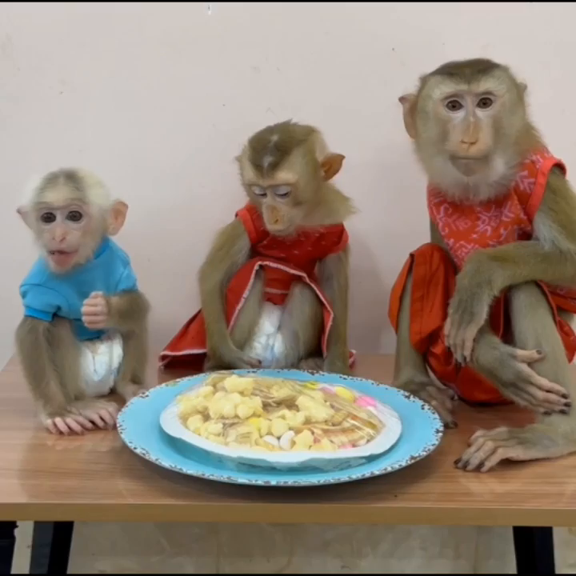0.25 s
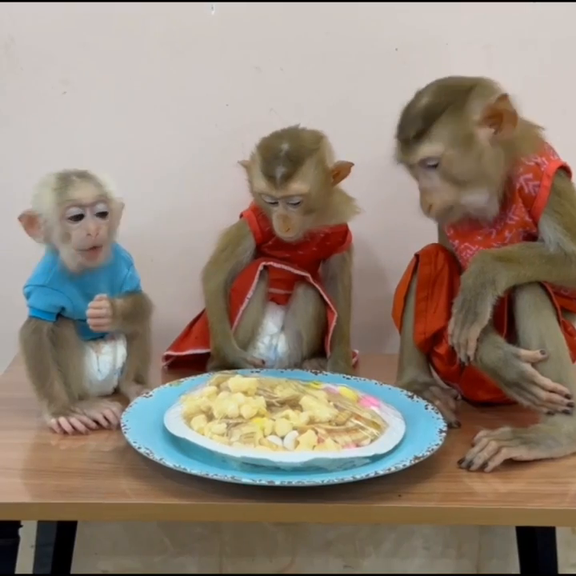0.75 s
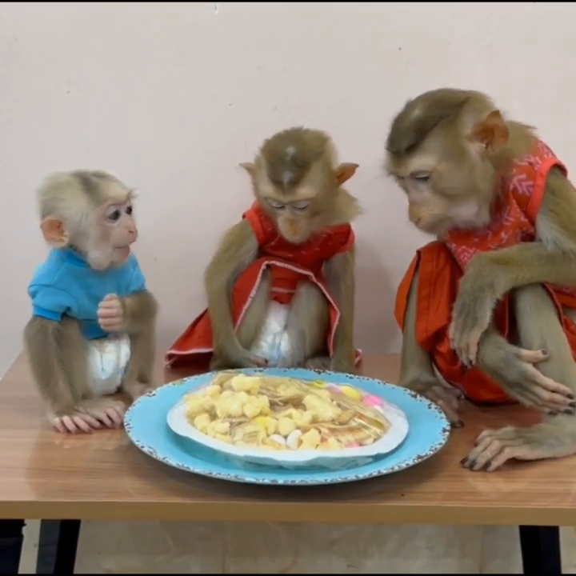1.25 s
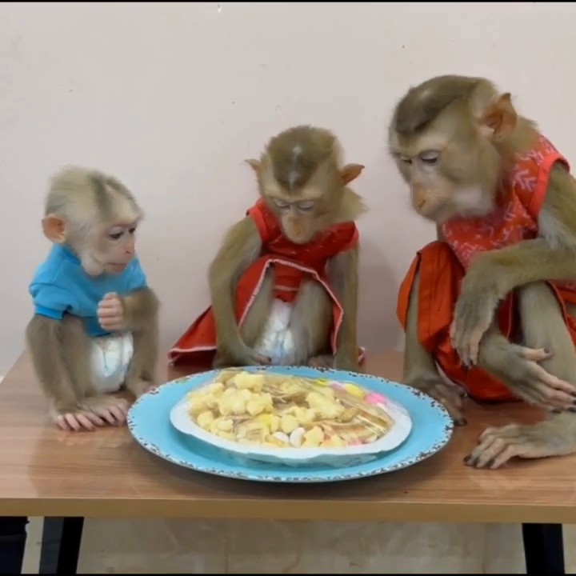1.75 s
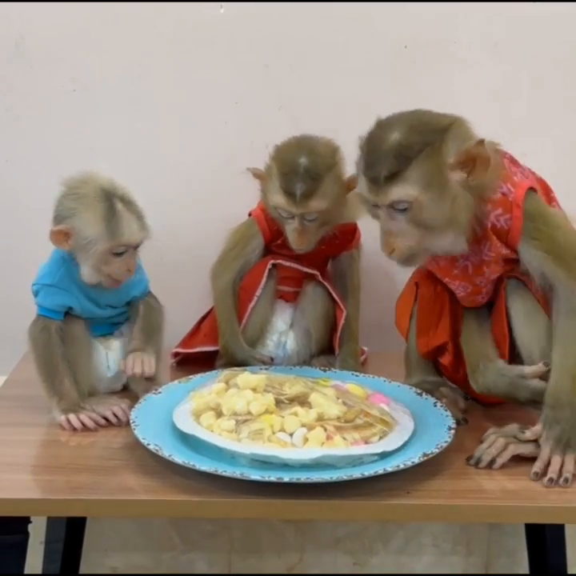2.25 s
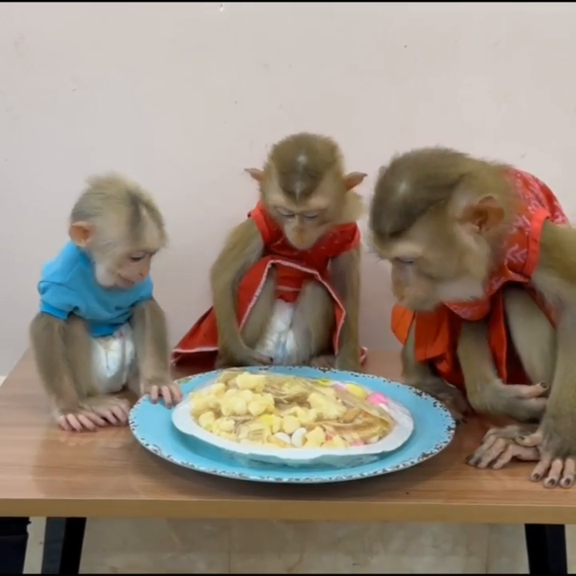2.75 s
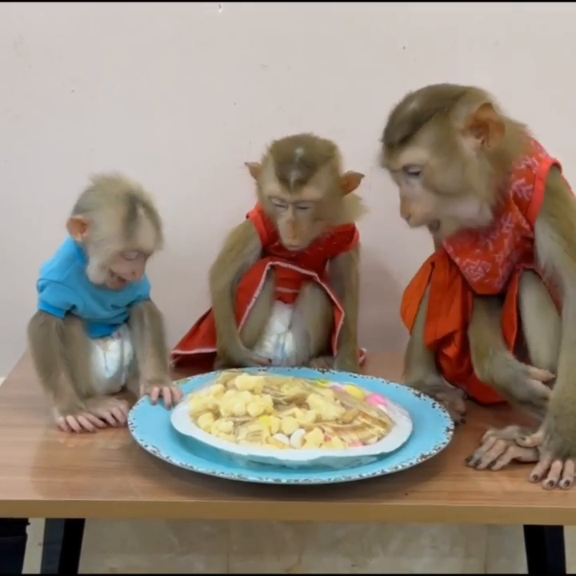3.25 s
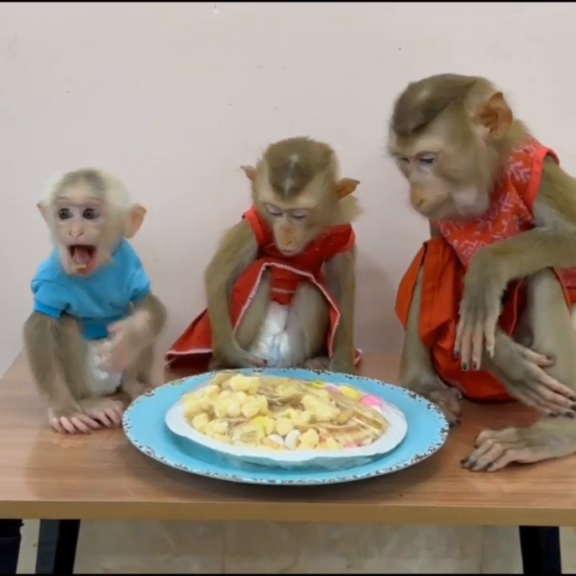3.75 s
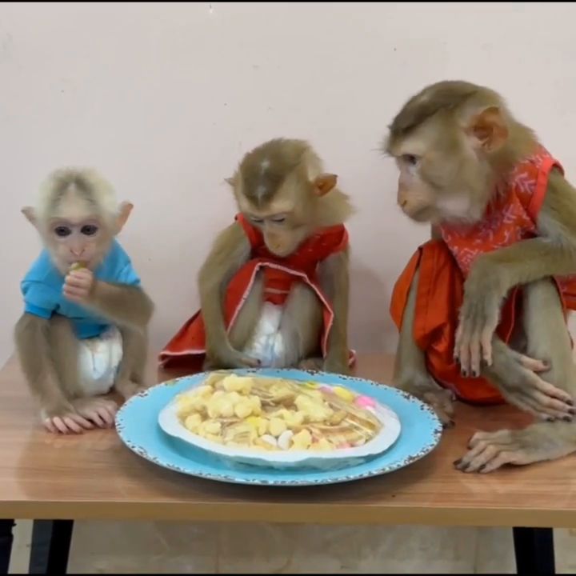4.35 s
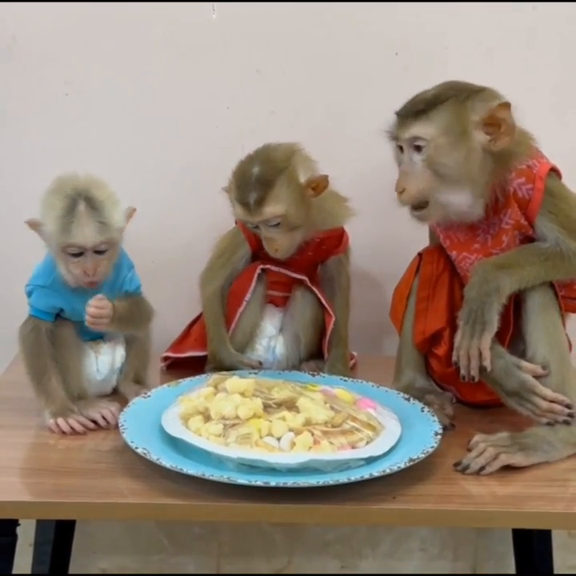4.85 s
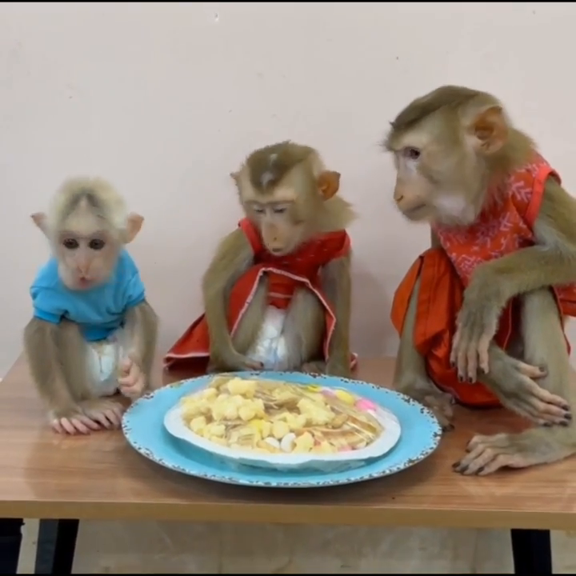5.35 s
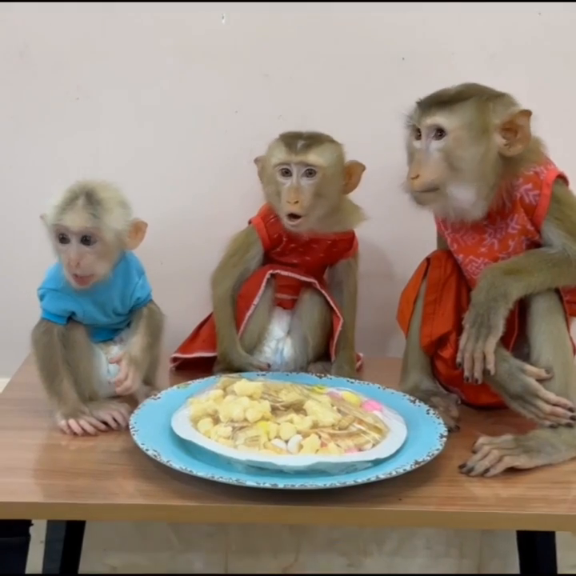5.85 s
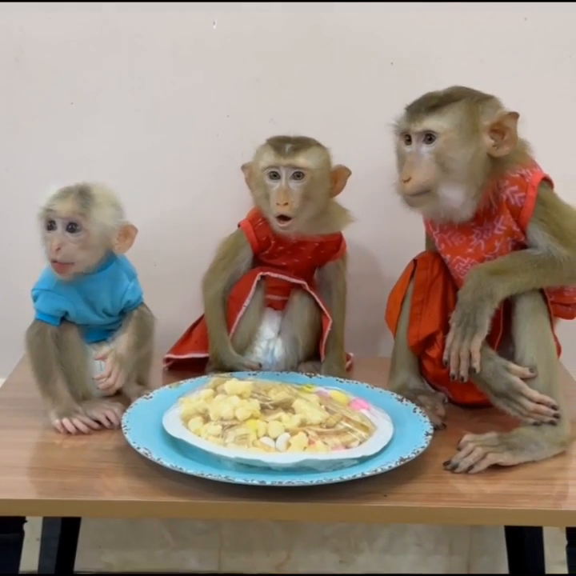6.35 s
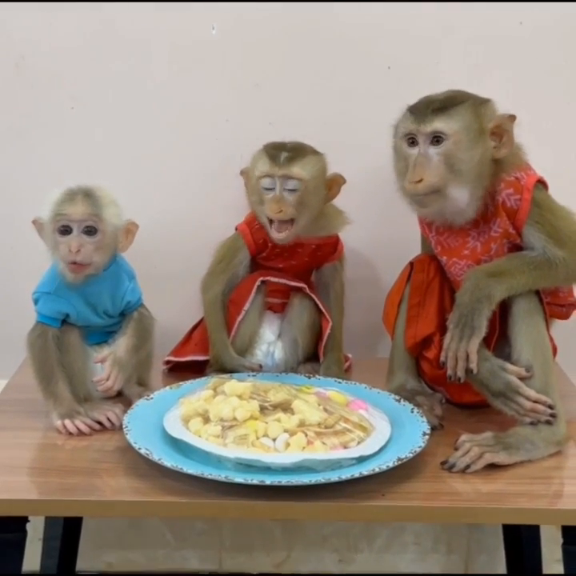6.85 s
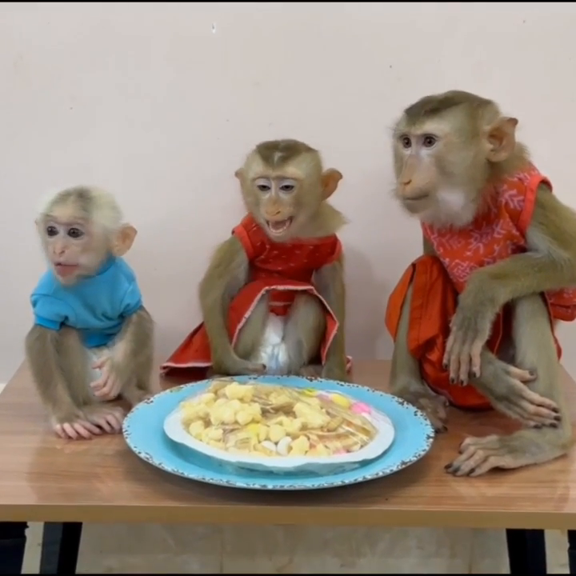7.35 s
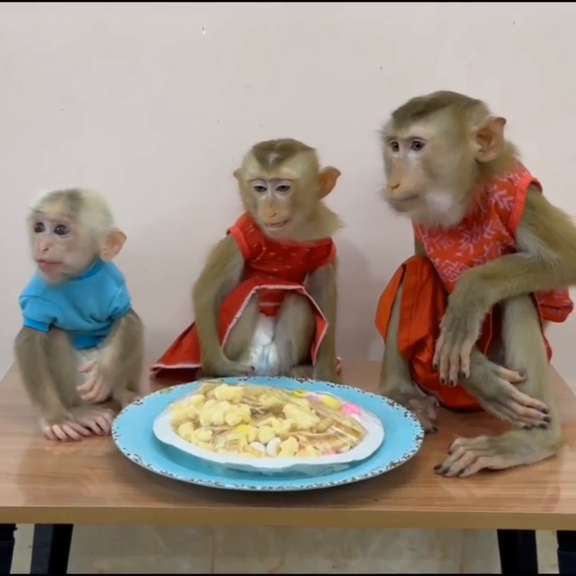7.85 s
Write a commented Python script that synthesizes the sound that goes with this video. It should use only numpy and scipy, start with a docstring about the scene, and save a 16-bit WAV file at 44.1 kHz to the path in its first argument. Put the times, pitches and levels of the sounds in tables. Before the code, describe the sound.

Clear whistling coos from small macaques over low room rumble, a few dull thumps, then a cracking voice and brief rasping screams.

```python
"""Young macaques on a wooden table in a bare, echoing room beg with arched coos; one coo climbs, a far one falls.
A coo is a nearly pure tone with overtones shaped by the throat; its pitch scoops up, holds, sags and drops.
The infant adds thin squeaks, and the juvenile's last coo cracks into three harsh shrieks: whistles that roughen.
Soft low thumps ring briefly, the first with a puff of air on the microphone (a dull burst of low noise);
something scuffs (grainy noise), and a low rumble of noise with a hum and a faint motor tone fills the room."""
import sys
import numpy as np
from scipy import signal
from scipy.fft import rfft, irfft, next_fast_len
from scipy.io import wavfile
from scipy.ndimage import uniform_filter1d

SR = 44100
rng = np.random.default_rng(int(sys.argv[2]) if len(sys.argv) > 2 else 0)


def master_out(mix):
    """Clip the mix to full scale and print it as 16-bit PCM to the path in sys.argv[1]."""
    frames = np.transpose(np.atleast_2d(mix))
    ceiling = np.clip(frames, -1, 1)
    pcm = np.round(ceiling * 32767).astype(np.int16)
    wavfile.write(sys.argv[1], SR, pcm)


N = 357651


def undb(db):
    """Turn decibels into a gain."""
    return 10 ** (np.asarray(db) / 20)


def unit(x):
    """Scale to an rms level of 1."""
    return x / np.sqrt(np.mean(x ** 2) + 1e-18)


def at(points, hz):
    """Read a curve of (Hz, value) points, spacing the pitches evenly by octave."""
    f, value = np.transpose(points)
    return np.interp(np.log(np.maximum(hz, 1)), np.log(f), value)


def colour(x, points):
    """Filter by a curve of (Hz, dB) points."""
    size = x.shape[-1]
    hz = np.arange(size // 2 + 1) * SR / size
    return irfft(rfft(x) * undb(at(points, hz)), size)


def waver(size, rate):
    """Smooth random drift with an rms of 1, renewed rate times a second."""
    hold = max(int(SR / rate), 1)
    smooth = uniform_filter1d(rng.standard_normal(size), hold)
    return unit(uniform_filter1d(smooth, hold))


def ramp(t, length):
    """Rise from 0 to 1 over a length of time."""
    return np.clip(t / length, 0, 1)


def hump(t, half_length):
    """A smooth rise and fall around time 0, down to 37 % one half length away."""
    return np.exp(-(t / half_length) ** 2)


def moments(length):
    """Sample times within a call, in seconds."""
    return np.arange(int(length * SR)) / SR


def add(out, start, x):
    """Mix x in, starting at a time in seconds."""
    i = int(start * SR)
    out[i:i + len(x)] += x[:len(out) - i]


def stereo_noise(size, width):
    """Noise in two channels; a (Hz, dB) curve sets the left-right difference against the common part."""
    mid, side = rng.standard_normal((2, size))
    pair = mid + np.array([[1], [-1]]) * colour(side, width)
    # the extra difference must not make the noise louder
    makeup = [(hz, -10 * np.log10(1 + undb(db) ** 2)) for hz, db in width]
    return colour(pair, makeup)


def rumble(mains_db=-55, motor_hz=160, motor_db=-62):
    """Low, nearly steady room noise with a wavering mains hum and a faint motor tone."""
    # Colour of the room noise. Each row: frequency in Hz, relative level in dB.
    spectrum = [(15, -48.5), (25, -24.5), (58, -4), (101, -3), (127, -8.5), (155, -12), (271, -13.5),
                (407, -16), (1910, -21), (3800, -38.5), (6980, -37), (7530, -37), (9220, -36.5),
                (10700, -54.5), (14000, -113.5), (22000, -120)]
    # Stereo width of the room noise. Each row: frequency in Hz, side level against mid in dB.
    width = [(60, -26.5), (190, -15.5), (550, -3.5), (1100, -1), (1900, -1.5), (3200, -55), (6000, -13.5),
             (10000, 2)]
    noise_db = -49
    t = np.arange(N) / SR
    noise = unit(colour(stereo_noise(next_fast_len(N), width), spectrum)[:, :N])
    noise = noise * undb(noise_db + 0.4 * waver(N, 5))
    mains = np.sin(2 * np.pi * 100 * t) * undb(mains_db + 2 * waver(N, 1.3))
    motor = np.sin(2 * np.pi * motor_hz * t) * undb(motor_db + 2 * waver(N, 1.4))
    return noise + mains + motor


def gesture(rows, edge):
    """Start time, on-off gate and sample-by-sample controls of one call; edge is the fade in seconds."""
    s, *columns = np.transpose(rows)
    t = np.arange(s[0] - edge / 2, s[-1] + edge / 2, 1 / SR)
    nearest_end = np.minimum(t - t[0], t[-1] - t)
    gate = np.sin(np.pi / 2 * ramp(nearest_end, edge)) ** 2
    return t[0], gate, [np.interp(t, s, c) for c in columns]


def harmonics(hz, throat, count):
    """Phase of the vocal folds, harmonic numbers and the throat's gain for each."""
    phase = 2 * np.pi * np.cumsum(hz) / SR
    k = np.arange(1, count + 1)[:, None]
    gain = undb(at(throat, k * hz)) * (k * hz < SR / 3)
    return phase, k, gain


def coos(calls, throat, tone_db, overtone_db, jitter, air_db=-25):
    """A nearly pure fundamental; overtones and a trace of air pass the throat as the mouth opens."""
    out = np.zeros(N)
    for rows in calls:
        start, gate, (hz, low_db, high_db) = gesture(rows, edge=0.0082)
        size = len(hz)
        hz = uniform_filter1d(hz, SR // 100) * (1 + jitter * waver(size, 230) + 0.0023 * waver(size, 60))
        phase, k, gain = harmonics(hz, throat, count=15)
        # lips and tongue tremble, so each overtone flutters
        gain = gain * undb([2 * waver(size, 43) for _ in k])
        loudness = np.sqrt((gain[1:] ** 2).sum(0) / 2)
        overtones = (gain * np.sin(k * phase))[1:].sum(0) / loudness
        # the air pulses once per cycle of the folds
        air = unit(colour(rng.standard_normal(size), throat)) * (1 + np.cos(phase)) * undb(air_db)
        tone = np.sqrt(2) * np.sin(phase) * undb(low_db + tone_db)
        add(out, start, gate * (tone + (overtones + air) * undb(high_db + overtone_db)))
    return out


def arch(s, length, top_hz, scoop, rise_s, sag, tone_db, overtone_db, swell_s, swell_db):
    """One coo's controls: pitch scoops, holds, sags and drops; loudness and brightness follow, with two swells."""
    # the pitch sags as the push wanes, then drops as the folds let go
    sag_s, drop_s, drop_octaves = 0.125, 0.021, 0.31
    # a young voice is never quite steady
    wobble_octaves, wobble_per_s = 0.00698, 22
    # the start is soft; the tone crests early (as a share of the length), then swells again
    attack_s, attack_db = 0.034, -3
    crest_share, crest_half_s, crest_db, swell_half_s = 0.27, 0.038, 4, 0.014
    # a shut mouth muffles the overtones
    mouth_open_s, mouth_close_s, mouth_shut_db = 0.043, 0.031, -8.5
    # a slacker voice is softer and duller
    tone_db_per_octave, overtone_db_per_octave = 22, 20.5

    t = moments(length)
    left = length - t
    slack = scoop * (1 - ramp(t, rise_s)) ** 2
    slack = slack + sag * (1 - ramp(left, sag_s))
    slack = slack + drop_octaves * (1 - ramp(left, drop_s)) ** 2
    hz = top_hz * 2 ** (wobble_octaves * waver(SR, wobble_per_s)[:len(t)] - slack)
    push_db = attack_db * (1 - ramp(t, attack_s))
    push_db = push_db + crest_db * hump(t - crest_share * length, crest_half_s)
    push_db = push_db + swell_db * hump(t - swell_s, swell_half_s)
    shut = 1 - ramp(t, mouth_open_s) * ramp(left, mouth_close_s)
    low_db = tone_db + push_db - tone_db_per_octave * slack
    high_db = overtone_db + mouth_shut_db * shut - overtone_db_per_octave * slack
    return np.transpose([s + t, hz, low_db, high_db])


def arches(voice):
    """Controls for all the arched coos of one voice."""
    # The arched coos. Each row: start in seconds, length in seconds, voice, top pitch in Hz before wobble,
    # scoop in octaves, rise in seconds, sag in octaves, fundamental and overtones in dB before the voice's trim,
    # time of the late swell after the start in seconds, swell in dB.
    coo_rows = [(0.141, 0.35, "open", 768.6, 0.18, 0.17, 0.14, -32.5, -46.5, 0.21, 5),
                (3.138, 0.31, "infant", 828, .08, .055, 0.078, -29, -45.5, 0.25, 5),
                (3.618, 0.2, "infant", 790.8, 0.25, 0.05, 0.051, -31.5, -42, 0.2, 3.5),
                (5.157, 0.39, "juvenile", 804.8, 0.12, 0.23, 0.16, -33, -45, 0.25, 12),
                (5.72, .227, "juvenile", 760, .15, 0.052, 0.0304, -33, -39, 0.088, 9),
                (6.132, .26, "juvenile", 774.6, .22, .11, .06, -32, -38.5, .226, 6.5),
                (6.637, .09, "juvenile", 949, 0.3, 0.079, 0.0069, -32, -35.5, 0.064, 1)]
    return [arch(s, length, *shape) for s, length, who, *shape in coo_rows if who == voice]


def open_coos():
    """An open-throated voice: an arched coo, then one that climbs."""
    # Throat resonances. Each row: frequency in Hz, relative gain in dB.
    throat = [(1600, 3.5), (2400, 4), (3050, 1.5), (3800, -0.5), (4600, -13.5), (5400, -14), (6200, 3),
              (7000, -11), (8300, -7), (9300, -4.5), (11000, -12.5)]
    # The climbing coo. Each row: time in seconds, pitch in Hz, fundamental and overtones in dB before the trim.
    rising = [(1.77, 743, -51, -64), (1.784, 757, -36.5, -65), (1.832, 844, -26.5, -49),
              (1.864, 867, -25, -56), (1.88, 874, -26.5, -50.5), (1.996, 985.5, -20.5, -43),
              (2.05, 1096, -35, -36), (2.098, 1424, -30.5, -42), (2.11, 1457, -23, -65)]
    return coos(arches("open") + [rising], throat, tone_db=-2.0, overtone_db=0.25, jitter=0.0057)


def puffs(top_hz=100):
    """Stirred air buffets each microphone port on its own: a dull, brief thump."""
    # Puffs of air. Each row: time of the peak in seconds, level in dB, half length in seconds.
    puff_rows = [(0.48, -46, 0.099), (1.943, -48.5, 0.049)]
    t = np.arange(N) / SR
    gust = sum(undb(db) * hump(t - s, half_s) for s, db, half_s in puff_rows)
    band = signal.butter(2, [top_hz / 2, top_hz], "band", fs=SR, output="sos")
    return gust * unit(signal.sosfilt(band, rng.standard_normal((2, N))))


def screams(calls, throat, gain_db, jitter, breadth, spread_hz):
    """Taut folds whistle; with roughness their cycles scatter, so each harmonic widens into a rasping band."""
    out = np.zeros(N)
    for rows in calls:
        start, gate, (hz, db, rough) = gesture(rows, edge=0.003)
        size, rough = len(hz), np.clip(rough, 0, 1)
        shaken_hz = hz * (1 + jitter * rough * waver(size, 1500))
        phase, k, gain = harmonics(shaken_hz, throat, count=6)
        gain = gain / np.sqrt((gain ** 2).sum(0) / 2)
        tone = (gain * np.sin(k * phase)).sum(0)
        scatter = np.array([waver(size, spread_hz) + 1j * waver(size, spread_hz) for _ in k])
        bands = (gain * scatter * np.exp(1j * k * phase)).real.sum(0)
        # at its roughest the voice fills the gaps between the bands as well
        filling = unit(colour(rng.standard_normal(size), throat))
        rasp = unit(unit(bands) + breadth * rough * filling)
        voice = np.sqrt(1 - rough ** 2) * tone + rough * rasp
        add(out, start, gate * undb(db + gain_db) * voice)
    return out


def hoarse_start():
    """The climbing coo begins hoarsely: a rasp around one pitch."""
    # Level of the hoarse start. Each row: time in seconds, level in dB before the trim.
    levels = [(1.58, -59), (1.636, -46.5), (1.652, -55.5), (1.77, -53), (1.778, -51), (1.785, -57)]
    # Throat resonances. Each row: frequency in Hz, relative gain in dB.
    throat = [(950, -20), (1420, 1.5), (1900, -23), (2500, -5.5), (3600, -31.5), (11000, -27)]
    pitch_hz, rough = 1410, 0.91  # roughness runs from 0 to 1
    rows = [(s, pitch_hz, db, rough) for s, db in levels]
    return screams([rows], throat, gain_db=6.5, jitter=0.039, breadth=1.0, spread_hz=460)


def thumps(push_s=0.0054):
    """Soft low thumps: a few low tones start together with a soft edge and ring briefly."""
    # Thumps; the first comes with a puff of air on the microphone.
    # Each row: start in seconds, level in dB before the ring of the modes.
    thump_rows = [(1.909, -36), (4.7, -39.5), (4.996, -38.5)]
    # Ringing low modes. Each row: frequency in Hz, level in dB, time to fade by 60 dB in seconds.
    modes = [(58, 5, 0.2), (84, -9, .12), (152, -2.5, 0.15), (243, -23, 0.18)]
    out, t = np.zeros(N), np.arange(SR // 2) / SR
    ring = sum(undb(db - 60 * t / t60) * np.sin(2 * np.pi * hz * t) for hz, db, t60 in modes)
    for s, db in thump_rows:
        add(out, s, undb(db) * ring * (1 - np.exp(-t / push_s)))
    return out


def scuffs(attack_s=0.00069):
    """Short, grainy brushes of noise."""
    # Scuffs. Each row: start in seconds, level in dB before grain and fade, decay time in seconds,
    # centre in Hz, width in octaves.
    scuff_rows = [(2.704, -43, 0.032, 6500, 1.8), (3.022, -53, 0.0063, 2700, 0.22)]
    out, t = np.zeros(N), np.arange(SR // 2) / SR
    for s, db, decay, hz, octaves in scuff_rows:
        band = [(hz * 2 ** (octaves * step), -3 * step ** 2) for step in range(-5, 6)]
        grain = unit(colour(rng.standard_normal(len(t)), band))
        grain = grain * undb(1.2 * waver(len(t), 150))
        add(out, s, undb(db) * grain * np.exp(-t / decay) * (1 - np.exp(-t / attack_s)))
    return out


def infant_coos():
    """Arched coos through the infant's throat."""
    # Throat resonances. Each row: frequency in Hz, relative gain in dB.
    throat = [(900, 26), (1600, -1.5), (2400, 5.5), (3250, -3), (3950, -15.5), (4700, -23.5), (5500, -13.5),
              (6300, -1), (7100, -12), (8200, -4.5), (9100, -28), (11000, -28.5)]
    return coos(arches("infant"), throat, tone_db=-2.66, overtone_db=2.0, jitter=0.0019)


def glide(s, length, first_hz, last_hz, db, fade_db, rough):
    """A straight slide of pitch and level; a negative fade grows louder."""
    return [(s, first_hz, db, rough), (s + length, last_hz, db - fade_db, rough)]


def squeaks():
    """The infant's thin squeaks: short, high slides of pitch."""
    # Squeaks. Each row: start in seconds, length in seconds, first and last pitch in Hz,
    # level in dB before the trim, fade in dB, roughness from 0 to 1.
    squeak_rows = [(3.647, 0.026, 5500, 5570, -17.5, 9, 0.11), (3.7, 0.121, 5550, 5490, -36, 8, 0.03),
                   (3.996, 0.027, 5150, 5245, -31, -5.5, 0), (4.029, 0.028, 5125, 4670, -18.5, 2.5, 0)]
    # Throat resonances. Each row: frequency in Hz, relative gain in dB.
    throat = [(2500, -19), (5100, 12), (7500, -89), (10200, 9.5), (12000, -55)]
    calls = [glide(*row) for row in squeak_rows]
    return screams(calls, throat, gain_db=-3, jitter=0.058, breadth=0.6, spread_hz=760)


def juvenile_coos():
    """Arched coos through the juvenile's throat."""
    # Throat resonances. Each row: frequency in Hz, relative gain in dB.
    throat = [(850, 2), (1550, 2), (2300, 4), (3050, -4), (3850, -12.5), (4500, -19), (5300, -18),
              (6100, -2), (6900, -13.5), (8000, -4), (9200, -30.5)]
    return coos(arches("juvenile"), throat, tone_db=-3.0, overtone_db=0.1, jitter=0.005)


def cracks():
    """Rough, sliding cracks of the voice lead from the last arched coo into the first shriek."""
    # Cracks. Each row: start in seconds, length in seconds, first and last pitch in Hz,
    # level in dB before the trim, fade in dB, roughness from 0 to 1.
    crack_rows = [(6.705, .036, 1900, 1453, -38.5, -3, 0.7), (6.742, .038, 2460, 1866, -32.5, 10.5, .8),
                  (6.778, 0.038, 2660, 3990, -41.5, -7, .85)]
    # Throat resonances. Each row: frequency in Hz, relative gain in dB.
    throat = [(900, -34.5), (1500, 7), (2400, -3.5), (4000, -14.5), (8500, -3.5), (11000, -13)]
    calls = [glide(*row) for row in crack_rows]
    return screams(calls, throat, gain_db=4.5, jitter=0.075, breadth=0.56, spread_hz=290)


def shriek(s, length, hz, sag, last_hz, yelp_db, whistle_db, burst_db, burst_s, whistle_rough, burst_rough):
    """One shriek's controls: a yelp flicks up into a quavering whistle, which gives way in a rough burst."""
    yelp_at_s, yelp_half_s, flick_s, flick_octaves = 0.0036, 0.0032, 0.00917, 0.3745
    # the whistle grows, then settles lower
    whistle_attack_s, whistle_sag_s = 0.0086, 0.018
    quaver_octaves, quaver_per_s = 0.04, 90
    burst_lead_s = 0.014  # the burst peaks this long before the end
    # the pitch gives way at the end; this last share of the call roughens
    collapse_s, rough_share = 0.024, 0.506

    t = moments(length)
    left = length - t
    slack = flick_octaves * (1 - ramp(t, flick_s)) ** 2 + sag * (1 - hump(t, whistle_sag_s))
    whistle_hz = hz * 2 ** (quaver_octaves * waver(SR, quaver_per_s)[:len(t)] - slack)
    pitch = whistle_hz + (last_hz - whistle_hz) * (1 - ramp(left, collapse_s)) ** 2
    yelp = undb(yelp_db) * hump(t - yelp_at_s, yelp_half_s)
    whistle = undb(whistle_db) * ramp(t, whistle_attack_s)
    burst = undb(burst_db) * hump(left - burst_lead_s, burst_s)
    push_db = 20 * np.log10(yelp + whistle + burst + 1e-9)
    rough = burst_rough + (whistle_rough - burst_rough) * ramp(left, rough_share * length) ** 4
    return np.transpose([s + t, pitch, push_db, rough])


def shrieks():
    """Three harsh shrieks: tight folds whistle, then break into a rasp."""
    # Shrieks. Each row: start in seconds, length in seconds, pitch in Hz before sag and quaver, sag in octaves,
    # last pitch in Hz, opening yelp, whistle and closing burst in dB before the trim,
    # burst half length in seconds, whistle roughness and burst roughness from 0 to 1.
    shriek_rows = [(6.817, 0.043, 3470, .06, 1933, -40.5, -23.5, -13.5, 0.0026, 0.39, 0.45),
                   (7.073, .11, 3730, .17, 2042, -6.5, -25.5, -16, 0.008, 0.16, 0.73),
                   (7.385, .04, 3079, 0.23, 3703, -29, -20, -16.5, 0.0064, 0.4, 0.9)]
    # Throat resonances. Each row: frequency in Hz, relative gain in dB.
    throat = [(1000, -41.5), (1550, -11), (2100, 3.5), (2650, -21.5), (3050, -3.5), (3700, -0.5),
              (4600, -0.5), (5600, -12.5), (6800, -6.5), (7500, -6), (8400, 6), (9200, -11), (10200, -3),
              (12000, -30)]
    calls = [shriek(*row) for row in shriek_rows]
    return screams(calls, throat, gain_db=-0.7, jitter=0.06, breadth=0.9, spread_hz=1200)


def low_coo():
    """A low, falling coo with a less steady pitch and more air."""
    # The falling coo. Each row: time in seconds, pitch in Hz, fundamental and overtones in dB before the trim.
    falling = [(7.345, 504, -47, -67), (7.379, 470.7, -44.5, -51), (7.463, 391.3, -49, -44),
               (7.493, 315, -47.5, -85), (7.52, 263, -53, -60)]
    # Throat resonances. Each row: frequency in Hz, relative gain in dB.
    throat = [(450, -18), (850, 10), (1300, -37), (4000, -42.5)]
    return coos([falling], throat, tone_db=1.5, overtone_db=-1, jitter=0.018, air_db=-14)


def room(x, echo_db, near_db, lead_s, gap_s=0.0059):
    """Direct sound, a slap off the table and the wall behind, then the diffuse ring of bare walls."""
    # Stereo width of the echoes. Each row: frequency in Hz, side level against mid in dB.
    width = [(200, -8), (750, 0), (1400, 2), (2400, -8), (3500, -8), (5500, -4), (9000, -1)]
    # Ring of the room. Each row: frequency in Hz, time to fade by 60 dB in seconds.
    ring_times = [(200, 0.15), (800, 0.96), (3200, 0.59), (6000, 0.68), (10000, 0.56)]
    t = np.arange(SR) / SR
    f, frames, cells = signal.stft(stereo_noise(SR, width), SR)
    decay = np.exp(-np.log(1000) * frames / at(ring_times, f)[:, None])
    # the ring waits for one gap, then fades in over another
    tail = signal.istft(cells * decay, SR)[1][:, :SR] * np.clip(t / gap_s - 1, 0, 1)
    near = stereo_noise(SR, width) * np.exp(-t / 0.029) * np.clip(t / 0.00025 - 1, 0, 1)
    response = (undb(echo_db) * unit(tail) + undb(near_db) * unit(near)) / np.sqrt(SR)
    # the sound reaches the left port a moment before the right
    hz = np.arange(N // 2 + 1) * SR / N
    late = irfft(rfft(x) * np.exp(-2j * np.pi * hz * lead_s), N)
    return np.array([x, late]) + signal.fftconvolve(x[None], response, axes=1)[:, :N]


def scene():
    """Calls, thumps and scuffs share one room; the low coo comes from further off."""
    gentle = open_coos() + hoarse_start() + thumps() + scuffs() + infant_coos() + juvenile_coos()
    soft = room(gentle, echo_db=-7, near_db=-12, lead_s=0.00002)
    shrill = room(squeaks() + cracks() + shrieks(), echo_db=-6.0, near_db=-8.5, lead_s=0.000025)
    far = room(low_coo(), echo_db=0.5, near_db=-18, lead_s=0)
    return rumble() + soft + puffs() + shrill + far


def record(dry):
    """The microphone has a narrow treble notch and a dull top, and rounds the loudest peaks."""
    # Microphone response. Each row: frequency in Hz, gain in dB.
    response = [(7050, 0), (7400, -24), (7600, -9.5), (7850, 1.5), (9700, -1.5), (11000, -24)]
    top_hz = 11400
    rounded = np.tanh(colour(dry, response))
    lowpass = signal.ellip(8, 0.2, 70, top_hz, fs=SR, output="sos")
    return signal.sosfilt(lowpass, rounded)


dry = scene()
out = record(dry)
master_out(out)
```